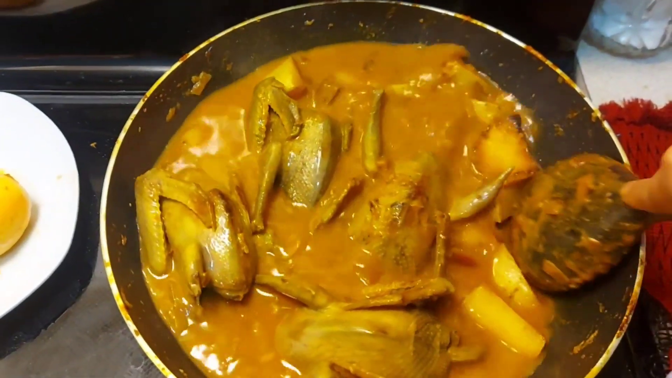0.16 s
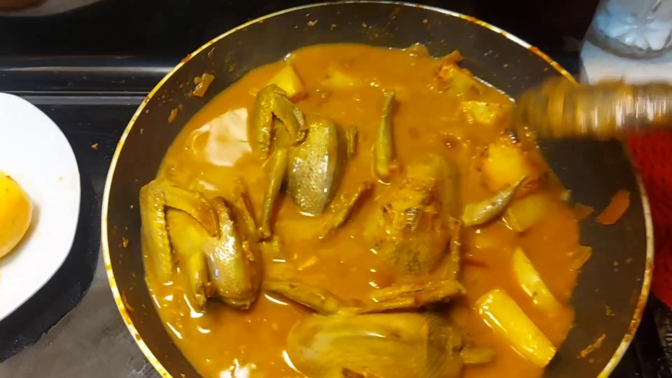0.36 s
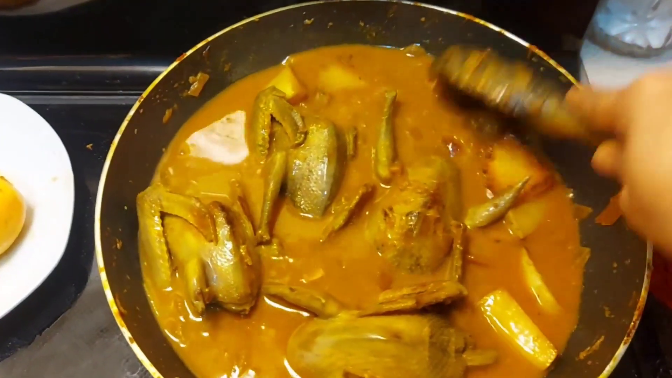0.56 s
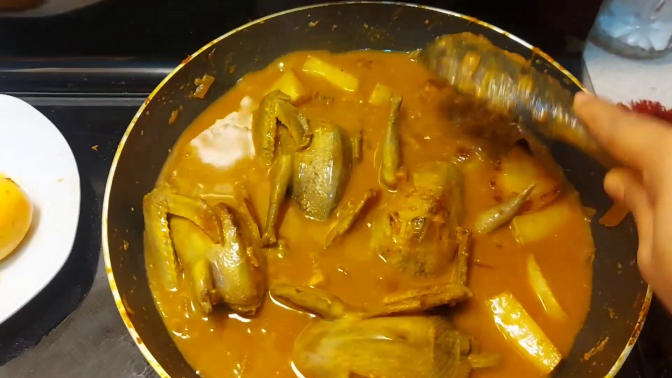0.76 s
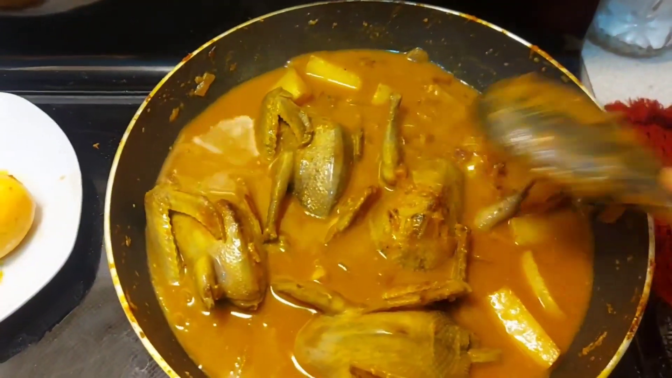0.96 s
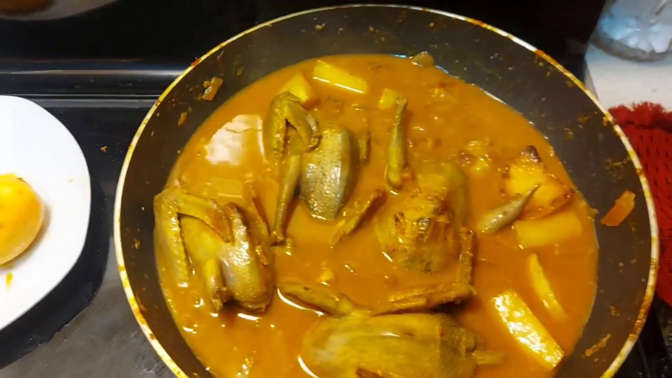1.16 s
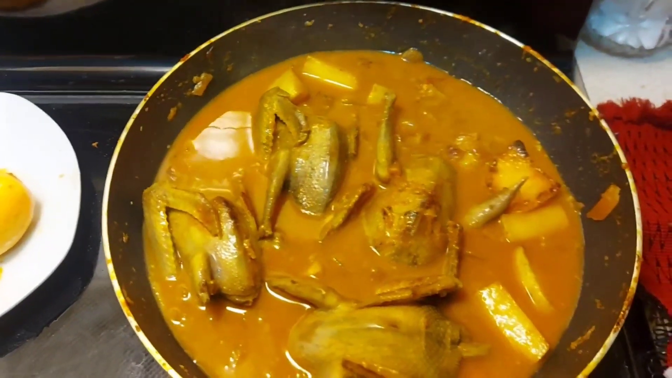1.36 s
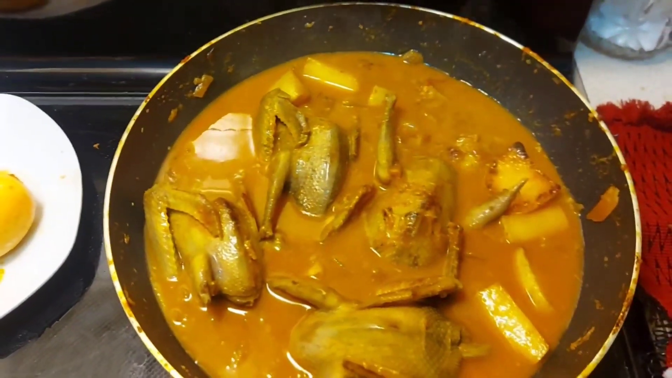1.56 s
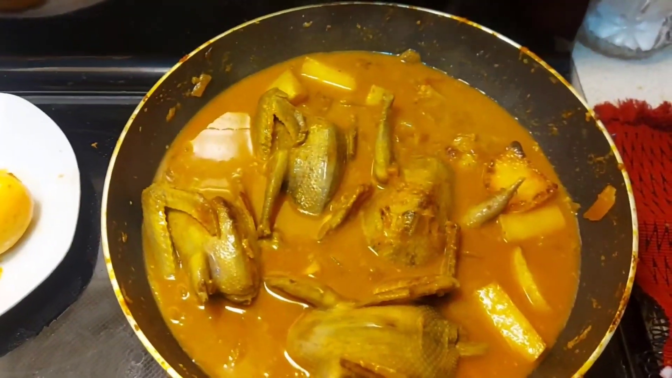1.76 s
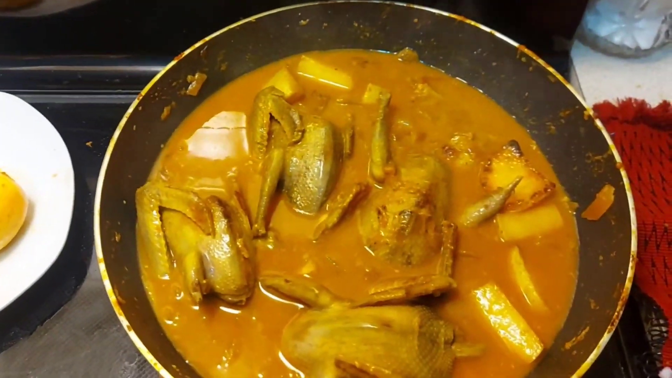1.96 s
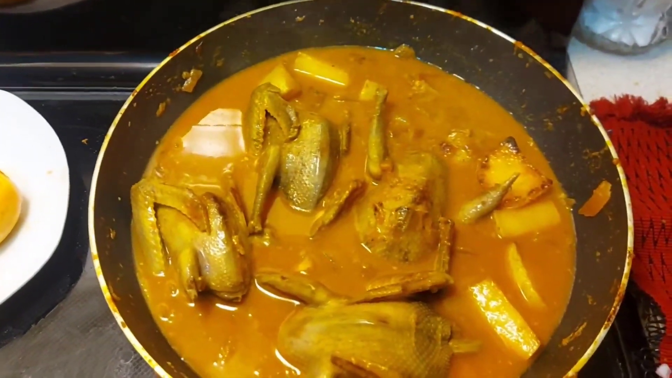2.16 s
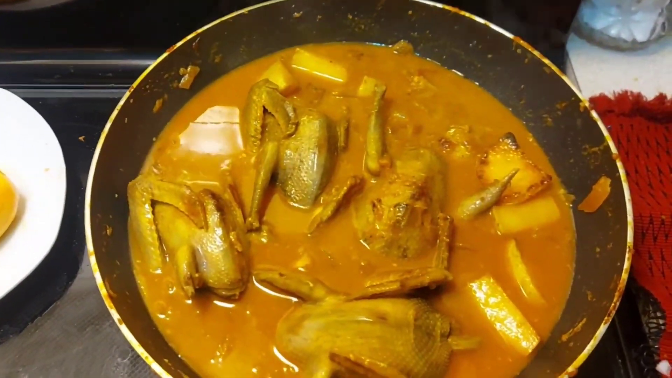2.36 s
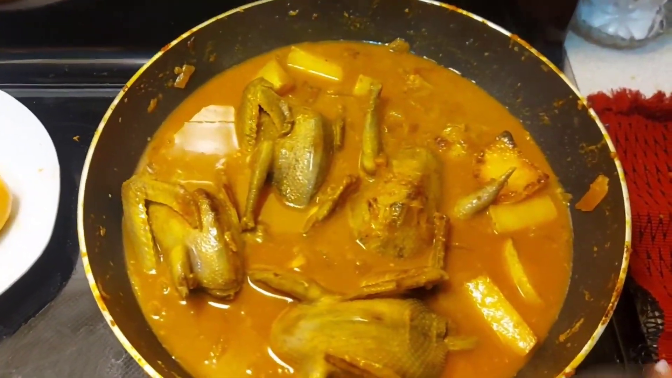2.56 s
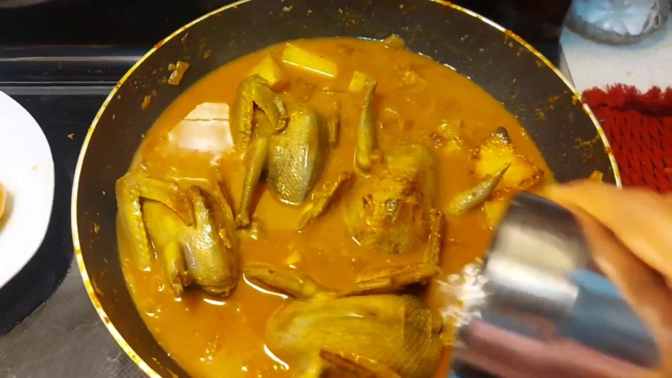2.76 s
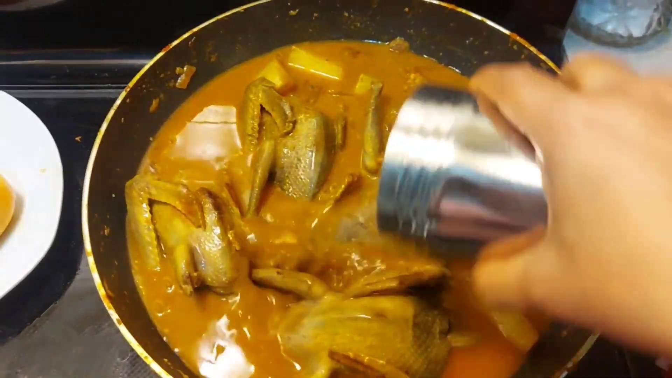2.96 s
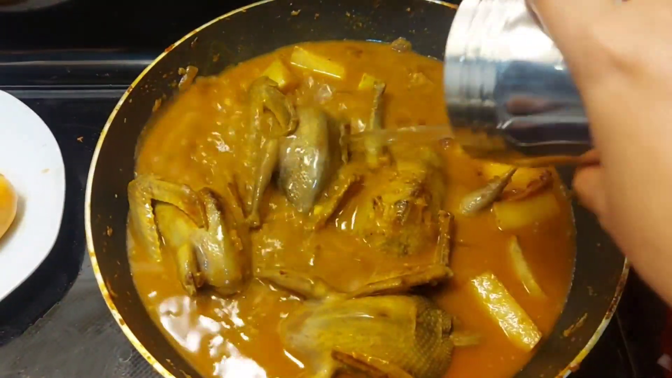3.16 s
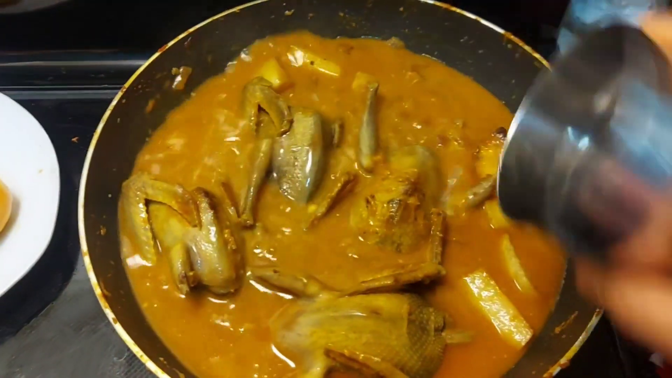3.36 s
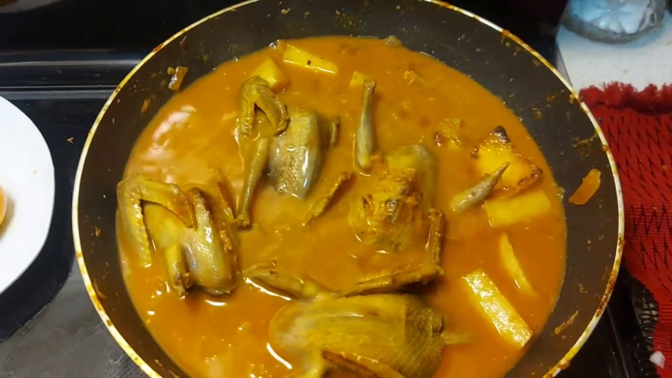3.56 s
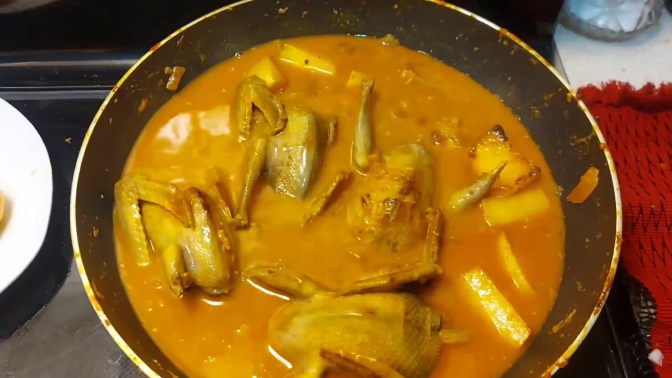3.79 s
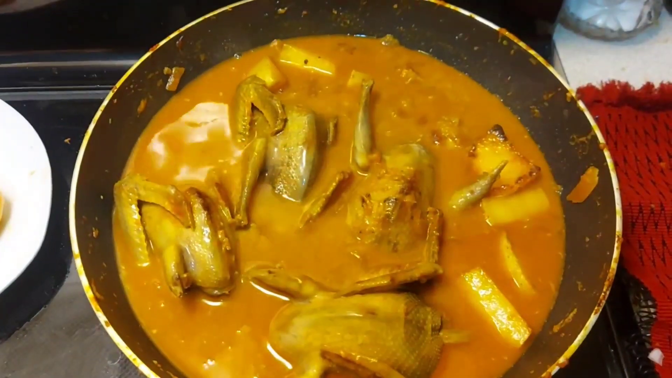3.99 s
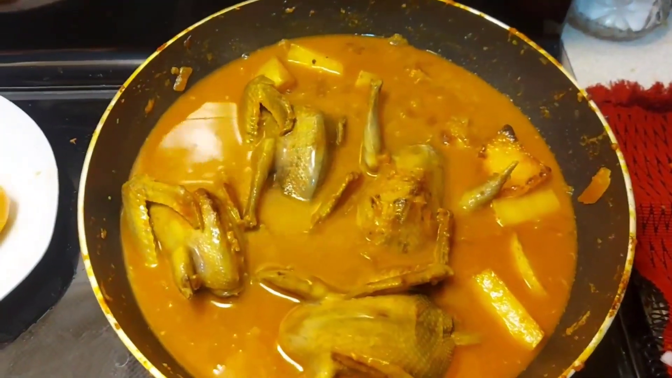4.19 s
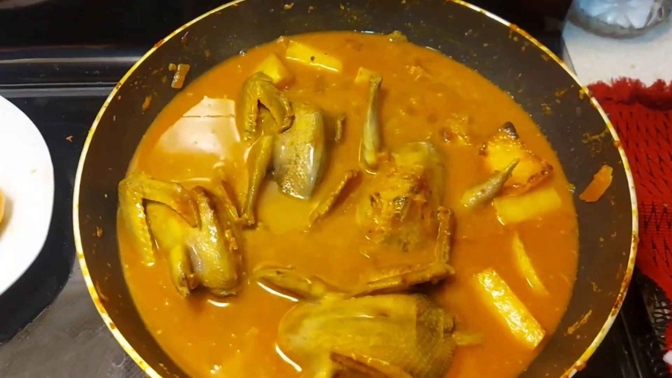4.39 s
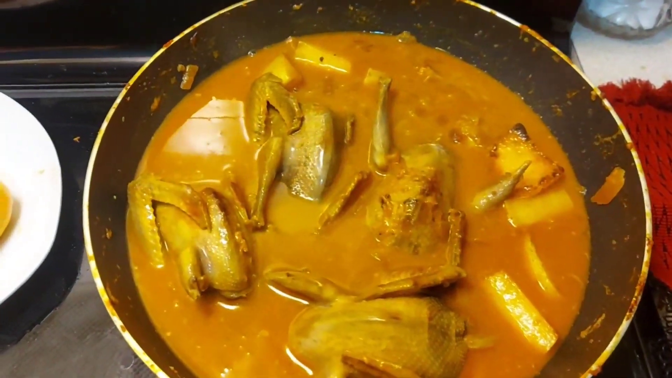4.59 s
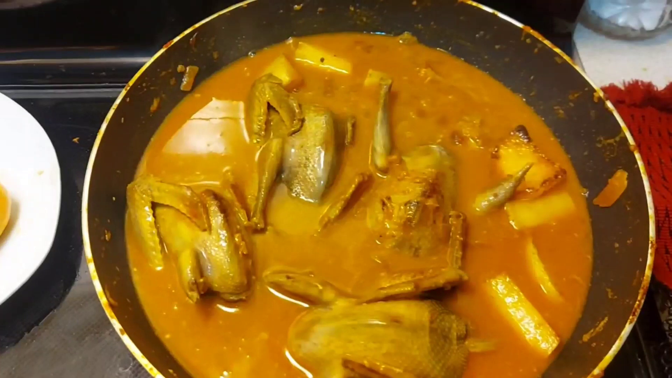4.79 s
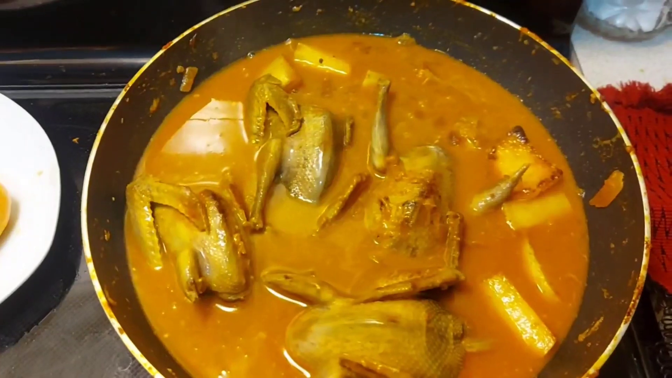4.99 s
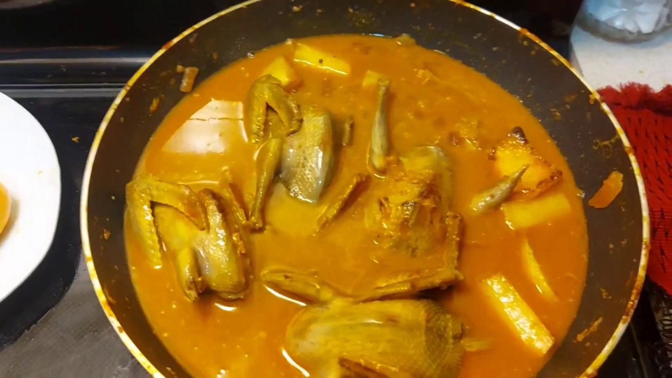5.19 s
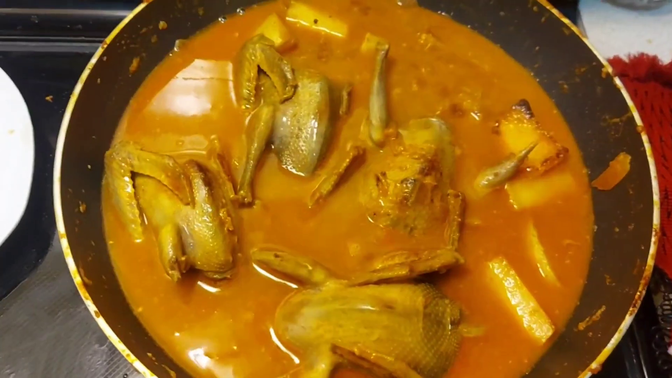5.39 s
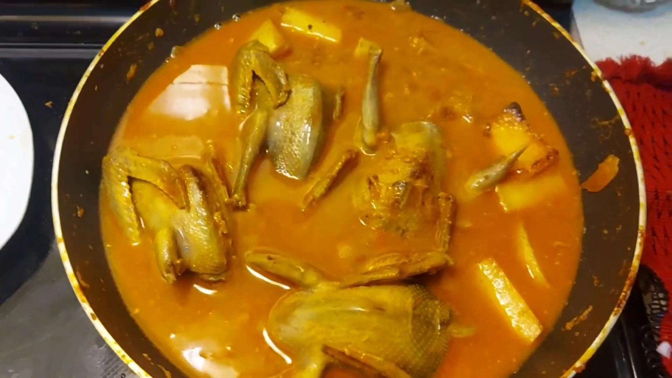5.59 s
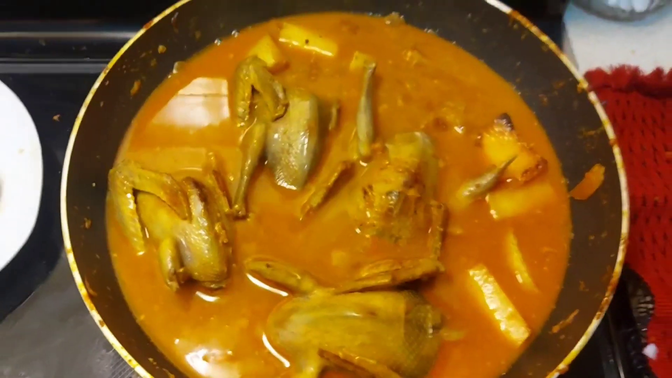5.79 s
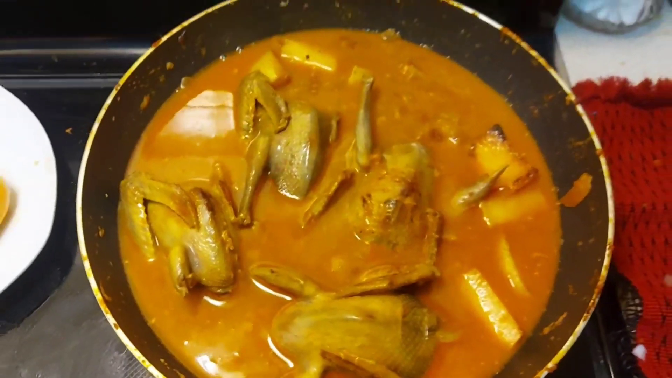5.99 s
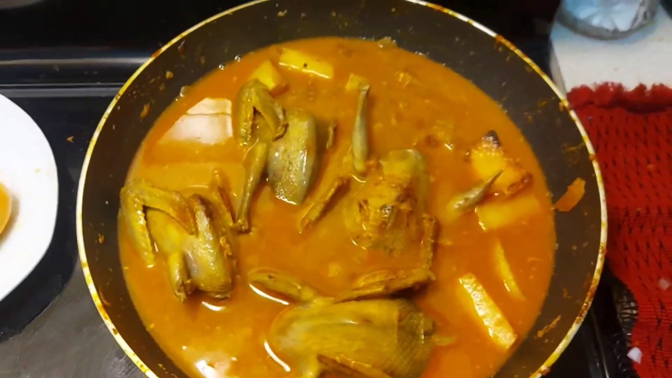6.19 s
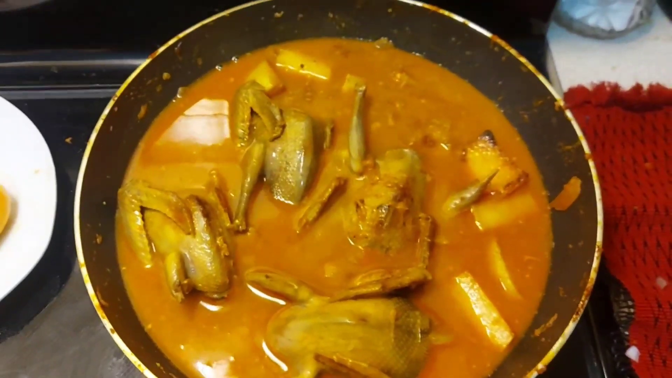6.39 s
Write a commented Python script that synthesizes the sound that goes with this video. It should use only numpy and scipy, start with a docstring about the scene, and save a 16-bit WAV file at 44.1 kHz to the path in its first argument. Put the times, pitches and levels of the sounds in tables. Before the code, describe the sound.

Low rumble, faint hum and a barely audible whine lie under everything. Muffled pan thuds with a scrape come first, then a spatula set down, a faint cup slide, a short bright bubbling splash, a loud cup knock with a softer clop, dull gravy plops, and a final ringing metallic bump. Close stereo microphone, short room tail, treble leaning left.

```python
"""A small kitchen, heard close to the stove on a stereo microphone, its short tail well below the direct sound.
A spatula leaves a pan of thin curry, tapping and scraping the rim, and is laid on the counter: thuds, dense
modes and rings. A steel cup slides off the counter, splashes water into the gravy (crowds of ringing bubbles,
wash, mist) and is set down with a sharp knock. The gravy plops in soft noise bursts, then a utensil rasps as
it is taken up and bumps the cookware. Rumble, hum and a thin whine of shaped noise and tone run throughout."""
import sys
import numpy as np
from scipy import signal
from scipy.fft import rfft, irfft, next_fast_len
from scipy.io import wavfile
from scipy.ndimage import uniform_filter1d

SR = 44100
rng = np.random.default_rng(int(sys.argv[2]) if len(sys.argv) > 2 else 0)


def dump_mix(stems):
    """Bounce the given channels to the path in sys.argv[1] as a 16-bit WAV at rate SR."""
    frames = np.atleast_2d(stems).T  # one column per channel
    limited = np.clip(frames, -1, 1)  # hard clip at full scale
    pcm = np.round(limited * 32767).astype(np.int16)
    wavfile.write(sys.argv[1], SR, pcm)


N = 284004
TIME = np.arange(N) / SR  # s, the whole scene
AGE = np.arange(SR * 3 // 4) / SR  # s, since the start of one event

# The kitchen's rumble. Each row: frequency in Hz, density in dB per Hz (relative).
ROOM_TONE = [(20, -7.5), (60, 7.5), (170, -1.5), (320, -6.5), (700, -16), (1000, -28), (3000, -33.5),
             (6300, -34), (8500, -50), (12000, -33), (16000, -43)]
# How loud the rumble stands. Each row: time in seconds, level in dB.
ROOM_LEVEL = [(4.0, -57), (4.95, -63), (5.25, -58)]
# Fine sizzle of the pan. Each row: time in seconds, level in dB before it is leaned to the left.
SIMMER = [(5.1, -78.5), (5.4, -76)]
# Likeness of the two ports in diffuse noise. Each row: frequency in Hz, left-right coherence from 0 to 1.
LIKENESS = [(60, 0.94), (250, 0.94), (600, 0.54), (1200, 0.034)]
# How far the left port leads. Each row: frequency in Hz, left minus right in dB.
LEFT_LEAD = [(350, 0), (1400, 4.5), (2800, 1.5), (5500, 8.5), (10000, 20), (15000, 10)]
# The room's tail. Each row: frequency in Hz, t60 in seconds.
KITCHEN_T60 = [(100, 0.41), (1500, 0.43), (4000, 0.26), (15000, 0.27)]

# Soft plops of the warming gravy. Each row: start in seconds, level in dB.
PLOPS = [(5.345, -59.5), (5.38, -59), (5.46, -62), (5.55, -61.5), (5.636, -61), (5.723, -63.5),
         (5.828, -61), (5.865, -56.5), (6.312, -63)]
# When the small bubbles pop between the plops: first and last second.
BUBBLING_S = (5.28, 6.0)
# Droplets flung from the splash and the cup's lip. Each row: landing in seconds, level in dB.
DROPLETS = [(3.283, -49), (3.401, -65), (3.66, -69.5), (3.78, -69.5)]
# Single large bubbles and drips. Each row: start in seconds, starting pitch in Hz, bubble level in dB.
DRIPS = [(2.921, 880, -47), (2.942, 1483, -51), (3.036, 5540, -38.5), (3.18, 1065, -35),
         (3.198, 3350, -25.5), (3.226, 2054, -32)]
# Bubbling of the unbroken stream of water. Each row: time in seconds, level in dB.
STREAM = [(2.915, -63), (3.02, -64), (3.16, -49), (3.25, -51.5), (3.37, -80)]
# Gushes of the poured water. Each row: start in seconds, level in dB, length in seconds
# before a further 2 ms, typical bubble pitch in Hz.
GUSHES = [(2.94, -54.5, 0.039, 2000), (3.0086, -43.5, 0.026, 3430), (3.046, -49, 0.025, 3250),
          (3.12, -43, .02, 3900), (3.18, -42.5, 0.012, 3160), (3.197, -42.5, .026, 3940),
          (3.222, -48.5, 0.019, 2400), (3.279, -46, 0.023, 4350)]

# The spatula scrapes along the rim. Each row: time in seconds, level in dB.
RIM_SCRAPE = [(.46, -61), (.478, -50), (.51, -60), (.545, -56), (.61, -66), (.67, -79)]
# Resonances of the pan wall that its slips excite, in Hz.
RIM_HZ = [1600, 2315, 2640, 3820]
# The cup slides off the counter. Each row: time in seconds, level in dB.
CUP_SLIDE = [(2.06, -67.5), (2.2, -63.5), (2.225, -57), (2.3, -52), (2.33, -58), (2.42, -70.5)]
# Resonances of cup and counter that its slips excite, in Hz.
CUP_SLIDE_HZ = [500, 960, 1460, 2440, 3320]
# The utensil drags as it is taken up. Each row: time in seconds, level in dB.
UTENSIL_RASP = [(5.997, -59), (6.004, -46), (6.025, -63.5), (6.09, -60.5)]
# Resonances of the utensil's drag, in Hz.
UTENSIL_RASP_HZ = [2560, 3250]
# Sharp ticks of spatula and utensil on the cookware. Each row: start in seconds, level in dB, t60 in seconds.
TICKS = [(0.171, -48.5, 0.028), (0.687, -47, 0.027), (6.425, -34, 0.098)]
# Colour of a tick. Each row: frequency in Hz, density in dB per Hz (relative).
TICK_COLOUR = [(900, -19), (1700, -4.5), (4250, 3.5), (5170, -4), (6790, -14.5), (8320, -49)]

# Blows, one table for each thing struck. Each row: start in seconds, strength in dB, hardness in dB
# (brightens the blow), damping in dB (hand or gravy takes the ring away).
PAN_BLOWS = [(.075, -51, -7.5, 37), (.112, -45, -0.5, 1.5), (.286, -52, -2.5, 4.5), (.469, -41, 1.5, 5),
             (.521, -41.5, -17, -7), (.537, -39, -4, -4), (.597, -38.5, -7, 34), (.688, -49.5, 5, 31),
             (.871, -45, -4, 41), (.96, -51, -13, 36)]
# Spatula laid on the counter. Each row: start in seconds, strength, hardness and damping in dB.
COUNTER_BLOWS = [(1.429, -43, -34, 1), (1.616, -38.5, -10, 7), (1.621, -36.5, -3.5, -3.5),
                 (1.638, -59.5, 20, 9)]
# Cup picked up. Each row: start in seconds, strength, hardness and damping in dB.
CUP_TOUCHES = [(2.039, -51.5, -9, 23), (2.05, -52.5, 4.5, 5.5), (2.16, -59.5, -3, 9), (2.207, -65, 14, -5),
               (2.294, -67, 15.5, 1)]
# Cup set down. Each row: start in seconds, strength, hardness and damping in dB.
CUP_KNOCKS = [(3.8673, -29, 3, -0.5), (3.874, -35.5, 2, 20.5), (4.0274, -37.5, -10, 15),
              (4.0384, -36, -7, 7.5)]
# Utensil taken up. Each row: start in seconds, strength, hardness and damping in dB.
UTENSIL_TOUCHES = [(5.999, -51.5, -8, 19), (6.095, -45.5, 3, -5.5), (6.17, -45, -3.5, 31),
                   (6.19, -44, 0, 29.5)]
# Utensil against the cookware. Each row: start in seconds, strength, hardness and damping in dB.
COOKWARE_BUMPS = [(6.3935, -34, 2.5, 27), (6.4015, -32.5, -14.5, 2.1), (6.4245, -35, -3, 6.7)]
# Ringing modes, one table for each thing. Each row: frequency in Hz, relative level in dB, t60 in seconds.
PAN_MODES = [(400, -2.5, 0.074), (730, 3.5, 0.057), (1137, 1, 0.18), (1527, -8.5, 0.17), (2283, -14, 0.17)]
# Modes of the counter. Each row: frequency in Hz, relative level in dB, t60 in seconds.
COUNTER_MODES = [(111.7, 9, 0.18), (292, 2, 0.14), (746, 0.5, 0.092)]
# Modes of the cup held in the hand. Each row: frequency in Hz, relative level in dB, t60 in seconds.
CUP_IN_HAND = [(1830, 2.4, 0.15), (3040, 9, 0.077), (4100, 5.4, 0.12), (4850, 7.9, 0.14), (6820, 9, 0.049)]
# Modes of the cup on the counter. Each row: frequency in Hz, relative level in dB, t60 in seconds.
CUP_ON_COUNTER = [(145, -8.5, .35), (298.5, 1.5, .27), (396.6, -1.5, .26), (599, -4, .28), (826, 0, 0.15),
                  (1073, -12, .3), (1431, -10.5, 0.44), (1805, -8, .33), (1946, -12, 0.28),
                  (2264, -13, 0.42), (2415, -8, 0.48), (2860, -10.5, .23), (3390, -12, 0.3),
                  (4180, -13.5, 0.37), (7100, -19, 0.37), (7400, -19.5, 0.15)]
# Modes of the cup's base. Each row: frequency in Hz, relative level in dB, t60 in seconds.
CUP_BASE = [(317, 0, 0.22), (851, 1.5, 0.079), (1133, 3, 0.13), (2740, 7, .04), (4050, -4, 0.044)]
# Modes of the utensil. Each row: frequency in Hz, relative level in dB, t60 in seconds.
UTENSIL_MODES = [(554, -3, 0.25), (2222, 11.5, 0.04), (3980, 2.5, 0.042), (11130, 2.5, 0.056)]
# Modes of the cookware. Each row: frequency in Hz, relative level in dB, t60 in seconds.
COOKWARE_MODES = [(286, 6, 0.23), (602, 6, 0.072), (1547, -7, 0.62), (2784, -3.5, 0.84)]
# Dense, short-lived modes of most blows. Each row: frequency in Hz, density in dB per Hz (relative).
BLOW_COLOUR = [(300, 5.5), (800, 4), (1300, 1), (2600, -4), (3600, -10), (5200, -10), (7400, -20),
               (8400, -34.5), (10800, -22.5), (15500, -39)]
# Dense modes of the steel cup set down. Each row: frequency in Hz, density in dB per Hz (relative).
CUP_COLOUR = [(850, 6.5), (1150, 2.5), (2600, 0.5), (4200, -7), (5450, -8), (6400, -23.5), (6850, -6),
              (7550, -13), (8300, -42), (10800, -19), (15500, -33)]

EDGE_HZ = 15900  # top of the recorder's band
MIST_HZ = 8250  # mist and droplets sound above this
WHINE_HZ, WHINE_DB = 3240, -87.5  # lower edge and level of the thin whine
PLOP_HZ, PLOP_OCTAVES_PER_DB = 723, -0.04  # pitch of the strongest plop; its sign lifts the weaker ones
DRIP_T60_AT_1K, DRIP_T60_SLOPE = 0.048, 0.28  # s at 1 kHz; octaves of t60 lost per octave of pitch
GRIT_T60 = 0.017  # s, one slip's speck of noise
THUD_OCTAVES_PER_DB = .045  # a lighter blow thuds higher
CLACK_PER_HARDNESS = .5  # dB of clack per dB of hardness
SOFTENING = 0.3  # dB of rise time per dB of hardness lost: softer contacts build more slowly
RING_WAVER_PER_S, ROUGH_HZ = 80, 3800  # loose contact makes the modes waver, fully so above this pitch
LEFT_RIGHT = np.array([[1], [-1]])


def amp(db):
    """Decibels to gain."""
    return 10 ** (np.asarray(db) / 20)


def evened(x):
    """Scales to rms 1."""
    return x / np.sqrt(np.mean(x ** 2) + 1e-20)


def struck(x):
    """Scales a blow to rms 1 over its first 25 ms."""
    return x / np.sqrt(np.mean(x[..., :SR // 40] ** 2) + 1e-20)


def read(points, hz):
    """A spectrum read on a log-frequency axis."""
    f, value = np.transpose(points)
    return np.interp(np.log(hz + 1), np.log(f + 1), value)


def level(curve):
    """A dB curve as a gain for every sample."""
    return amp(np.interp(TIME, *np.transpose(curve)))


def dying(t, t60):
    """Falls 60 dB in t60 seconds."""
    return np.exp(-np.log(1000) * t / np.maximum(t60, 1e-3))


def add(mix, s, sound):
    """Mixes a sound in at s seconds."""
    part = mix[:, max(round(s * SR), 0):][:, :sound.shape[-1]]
    part += sound[..., :part.shape[1]]


def band(x, lo, hi, order=3):
    """Causal band-pass."""
    sos = signal.butter(order, [lo, min(hi, SR / 2 - 1)], "band", fs=SR, output="sos")
    return signal.sosfilt(sos, x)


def noise(size, colour=None):
    """Stereo noise, alike in the bass and unrelated in the treble."""
    length = next_fast_len(size)
    hz = np.fft.rfftfreq(length, 1 / SR)
    a, b = rfft(rng.standard_normal((2, length)))
    same = np.clip(read(LIKENESS, hz), 0, 1)
    spectrum = np.array([a, same * a + np.sqrt(1 - same ** 2) * b])
    if colour is not None:
        spectrum = spectrum * amp(read(colour, hz))
    return evened(irfft(spectrum, length)[:, :size])


def background(hum_hz=64.8, hum_db=-68, apart_db=-14, whine_width_hz=45):
    """Room rumble, a wavering hum, a thin whine and the fine sizzle of the pan."""
    unrelated = np.array([noise(N, ROOM_TONE)[0] for port in range(2)])
    rumble = noise(N, ROOM_TONE) + amp(apart_db) * unrelated
    waver = evened(band(rng.standard_normal(N), 1.0, 5, order=1))
    hum = amp(hum_db) * evened((1 + 0.52 * waver) * np.sin(2 * np.pi * hum_hz * TIME))
    crackling = noise(N) * amp(3 * rng.standard_normal(N))
    sizzle = evened(band(crackling, 1400, 4800, order=2)) * amp([[2.5], [-5]])  # leans left
    whine = amp(WHINE_DB) * evened(band(noise(N), WHINE_HZ, WHINE_HZ + whine_width_hz, order=2))
    return level(ROOM_LEVEL) * rumble + hum + whine + level(SIMMER) * sizzle


def kitchen(x):
    """A short diffuse tail of the room, each band dying at its own speed."""
    hz, t, z = signal.stft(noise(len(AGE)), SR, nperseg=256)
    faded = z * dying(t, read(KITCHEN_T60, hz)[:, None])
    tail = signal.istft(faded, SR, nperseg=256)[1][:, :len(AGE)]
    tail = tail * np.clip((AGE - .003) / 0.0036, 0, 1)  # silent for 3 ms, then fades in
    return signal.fftconvolve(x, tail / np.linalg.norm(tail[0]), axes=1)[:, :N]


def bubble(hz, t60, glide=0.17):
    """A trapped bubble rings and climbs in pitch as it nears the surface."""
    t = AGE[:SR // 16]
    climb = 1 + glide * np.minimum(t / max(t60, 1e-3), 1)
    turns = np.cumsum(hz * climb) / SR
    lag = rng.uniform(-3.0, 2.6) * LEFT_RIGHT  # radians
    return np.sin(2 * np.pi * turns + lag) * dying(t, t60) * (1 - np.exp(-2 * hz * t))


def crowd(length, centre_hz, per_s, spread, cycles, size_db=6.5):
    """Bubbles of scattered pitch and size, trapped one after another; rms 1 while they form."""
    out = np.zeros((2, len(AGE)))
    draws = rng.random((900, 3))[:int(length * per_s) + 1]
    for k, (when, pitch, size) in enumerate(draws):
        hz = centre_hz * np.exp(spread * (2 * pitch - 1))
        gain = amp(-size_db * np.log(size + 0.17))
        add(out, (k + when) / per_s, gain * bubble(hz, cycles / hz))
    return out / np.sqrt(np.mean(out ** 2) * len(AGE) / (length * SR))


def plops(t60=0.1, splash_db=-9, splash_hz=2000, pops_db=-70, pop_cycles=16, rise=0.0027):
    """Thick bubbles burst with a dull puff and a thin splash; small ones pop between them."""
    out = np.zeros((2, N))
    strongest_db = max(db for s, db in PLOPS)
    burst = dying(AGE, t60) * (1 - dying(AGE, rise))
    for s, db in PLOPS:
        hz = PLOP_HZ * 2 ** (PLOP_OCTAVES_PER_DB * (db - strongest_db))
        puff = struck(band(noise(len(AGE)) * burst, hz / 1.51, hz * 1.67))
        splash = struck(band(noise(len(AGE)) * burst, splash_hz / np.sqrt(2), splash_hz * np.sqrt(2)))
        add(out, s, amp(db) * (puff + amp(splash_db + db - strongest_db) * splash))
    for when, pitch, size in rng.random(size=(70, 3)):
        hz = PLOP_HZ * 2 ** (2 * pitch - .5)
        pop = amp(pops_db + 20 * size - 10 * pitch) * bubble(hz, pop_cycles / hz)
        add(out, BUBBLING_S[0] + when * np.ptp(BUBBLING_S), pop)
    return out * amp(LEFT_RIGHT)  # 2 dB to the left


def droplets(t60=.007):
    """Flung droplets land with tiny bright clicks."""
    out = np.zeros((2, N))
    for s, db in DROPLETS:
        click = band(noise(len(AGE)) * dying(AGE, t60), MIST_HZ, EDGE_HZ, order=1)
        add(out, s, amp(db) * struck(click))
    return out


def drips(splat_db=-3):
    """A drop slaps the surface and leaves one ringing bubble; small bubbles die sooner."""
    out = np.zeros((2, N))
    for s, hz, db in DRIPS:
        tone = bubble(hz, DRIP_T60_AT_1K / (hz / 1000) ** DRIP_T60_SLOPE)
        size = tone.shape[1]
        splat = evened(band(noise(size), hz / 0.83, hz * 1.25)) * dying(AGE[:size], 0.055)
        splat *= 1 - dying(AGE[:size], 0.0033)  # the liquid yields, so the slap has a rounded edge
        add(out, s, amp(db) * (tone + amp(splat_db) * splat))
    return out


def pour(wash_db=-6, mist_db=-18, mist_t60=0.53, spit_db=5):
    """The stream bubbles on; each gush churns the gravy, traps a crowd of bubbles and throws up fine mist."""
    out = np.zeros((2, N))
    start_s, end_s = STREAM[0][0], STREAM[-1][0]
    add(out, start_s, crowd(end_s - start_s, 3200, per_s=900, spread=0.66, cycles=28))
    out *= level(STREAM)
    for s, db, length, centre in GUSHES:
        length = length + .002
        wash = evened(band(noise(len(AGE)), centre / 2, centre * 2)) * np.exp(-AGE / length)
        spits = amp(spit_db * evened(uniform_filter1d(rng.standard_normal(len(AGE)), size=60)))
        mist = evened(band(noise(len(AGE)) * spits, MIST_HZ, EDGE_HZ, order=1)) * dying(AGE, mist_t60)
        bubbles = crowd(length, centre, per_s=1700, spread=0.687, cycles=32)
        add(out, s, amp(db) * (bubbles + amp(wash_db) * wash + amp(mist_db) * mist))
    return out * amp(LEFT_RIGHT)  # 2 dB to the left


def ring(modes, spread_hz=1800):
    """Dying modes; the higher ones waver more and reach the two ports out of step."""
    out = np.zeros((2, len(AGE)))
    for k, (hz, db, t60) in enumerate(modes):
        lag = rng.choice([-1, 1]) * min(hz / spread_hz, np.pi / 4) * LEFT_RIGHT
        steps = rng.standard_normal(size=128) + 1j * rng.standard_normal(size=128)
        rough = min(hz / ROUGH_HZ, 1)
        wander = np.interp(AGE * RING_WAVER_PER_S, np.arange(len(steps)), steps)
        waver = (1 + rough * wander) / np.sqrt(1 + 2 * rough ** 2)
        mode = amp(db) * dying(AGE, t60) * waver * np.exp(2j * np.pi * hz * AGE)
        out += (-1) ** k * (mode * np.exp(1j * lag)).imag
    return struck(out)


def scrape(curve, resonances_hz, slips_per_s, grit_db, size_db=2.5, t60=.02):
    """A dragged thing sticks and slips; each slip gives a speck of grit and rings one resonance."""
    out = np.zeros((2, N))
    for hz in resonances_hz:
        sizes = amp(size_db * np.minimum(rng.exponential(size=N), np.pi))
        slips = (rng.random(N) < slips_per_s / SR) * sizes
        grit = struck(noise(len(AGE), BLOW_COLOUR) * dying(AGE, GRIT_T60))
        speck = ring([(hz, 0, t60)]) + amp(grit_db) * grit
        out += signal.oaconvolve(slips[None], speck[:, :SR // 20], axes=1)[:, :N]
    touching = (TIME > curve[0][0]) & (TIME < curve[-1][0])
    return touching * level(curve) * evened(out)


def drags():
    """Stick-slip of the spatula on the rim, the cup on the counter and the utensil as it is taken up."""
    return (scrape(RIM_SCRAPE, RIM_HZ, slips_per_s=45, grit_db=-3)
            + scrape(CUP_SLIDE, CUP_SLIDE_HZ, slips_per_s=130, grit_db=4)
            + scrape(UTENSIL_RASP, UTENSIL_RASP_HZ, slips_per_s=600, grit_db=-7.5, t60=0.011))


def ticks():
    """A dry tick of dying noise with no thud."""
    out = np.zeros((2, N))
    for s, db, t60 in TICKS:
        add(out, s, amp(db) * struck(noise(len(AGE), TICK_COLOUR) * dying(AGE, t60)))
    return out


def blows(rows, modes, thud_hz, clack_db, click_db, ring_db, crack_db, t60, thud_t60, rise,
          ripple_db=6.0, click_hz=2000, dulling=0, boom=0, colour=BLOW_COLOUR):
    """Each blow: a low thud of the support, a clack and a click of dense modes, and the thing's own ring."""
    out = np.zeros((2, N))
    # the contact cracks ahead of the ringing
    fade = dying(AGE, t60) * (1 + amp(crack_db) * dying(AGE, 0.016))
    # the dense modes cluster in peaks and valleys that belong to the thing, the same at every blow
    clusters = uniform_filter1d(rng.standard_normal(len(AGE) // 2 + 1), size=45)
    ripple = amp(ripple_db * evened(clusters))
    heaviest_db = max(row[1] for row in rows)
    sharpest_db = max(row[1] + row[2] for row in rows)
    for s, db, hardness, damping in rows:
        onset = 1 - dying(AGE, rise * amp(-SOFTENING * hardness))
        dense = irfft(rfft(noise(len(AGE), colour)) * ripple, len(AGE))
        hz = thud_hz * 2 ** (THUD_OCTAVES_PER_DB * (heaviest_db - db))
        thud = band(noise(len(AGE)) * dying(AGE, thud_t60), hz / 2.0, hz * 1.36, order=2)
        # the thing rocks on its support
        rocking = np.sin(2 * np.pi * hz * AGE) * dying(AGE, thud_t60) * onset
        thud = struck(thud) + boom * struck(rocking)
        clack = band(dense * fade, 420, 2000) * onset
        # with dulling, a gentler contact is duller
        top_hz = EDGE_HZ * amp(dulling * (db + hardness - sharpest_db))
        click = band(dense, click_hz, max(top_hz, 2 * click_hz)) * fade * onset
        blow = struck(thud)
        blow = blow + amp(click_db + hardness) * struck(click)
        blow = blow + amp(clack_db + CLACK_PER_HARDNESS * hardness) * struck(clack)
        blow = blow + amp(ring_db - damping) * ring(modes) * onset
        add(out, s, amp(db) * blow)
    return out


def spatula_on_pan():
    """The spatula's blows boom the pan on its support; above the bass the pan lies further left."""
    pan = blows(PAN_BLOWS, PAN_MODES, thud_hz=123.4, boom=0.8, clack_db=-21.0, click_db=-12.0,
                ring_db=-4.0, crack_db=20, t60=0.37, thud_t60=0.36, rise=0.034)
    return pan + band(pan, 710, 12000, order=1) * .2 * LEFT_RIGHT


def spatula_on_counter():
    """The spatula is laid down and the counter's low modes answer."""
    return blows(COUNTER_BLOWS, COUNTER_MODES, thud_hz=188, clack_db=-4.0, click_db=-4.5, ring_db=5.0,
                 crack_db=7.0, t60=0.16, thud_t60=0.17, rise=0.011, click_hz=4100)


def utensil_taken_up():
    """Light touches set off the utensil's short, high modes."""
    return blows(UTENSIL_TOUCHES, UTENSIL_MODES, thud_hz=278, clack_db=-11.5, click_db=-7.0, ring_db=-8.0,
                 crack_db=0, t60=0.18, thud_t60=0.26, rise=0.0061)


def cookware_bumped():
    """The utensil bumps the cookware, whose upper modes are long."""
    return blows(COOKWARE_BUMPS, COOKWARE_MODES, thud_hz=187, clack_db=-8.0, click_db=-6.0, ring_db=7.5,
                 crack_db=4.0, t60=0.16, thud_t60=0.1, rise=0.0034)


def cup_up():
    """Touches of the cup as it is picked up, its modes short in the hand."""
    return blows(CUP_TOUCHES, CUP_IN_HAND, thud_hz=123, clack_db=-10.0, click_db=-9.0, ring_db=2.5,
                 crack_db=4, t60=0.16, thud_t60=0.12, rise=0.0058)


def cup_down(flat_s=4.052, held_t60=0.27, base_db=-1, shock_db=-7, shock_s=.0003):
    """The cup lands on its edge with one hard shock, chatters and rings until it rocks flat:
    its base clops and the counter damps the wall."""
    cup = blows(CUP_KNOCKS, CUP_ON_COUNTER, thud_hz=230, clack_db=8.0, click_db=5.5, ring_db=5.5,
                crack_db=14.5, t60=0.21, thud_t60=0.13, rise=0.003, ripple_db=0.5, dulling=0.56,
                colour=CUP_COLOUR)
    u = AGE / shock_s
    add(cup, CUP_KNOCKS[0][0], amp(shock_db) * band((1 - u) * np.exp(-u), 100, 7000))
    for s, db, hardness, damping in CUP_KNOCKS:
        if s > flat_s - .1:  # only the last knocks reach the base
            add(cup, s, amp(db + base_db) * ring(CUP_BASE))
    return cup * dying(np.maximum(TIME - flat_s, 0), held_t60)


def ports(x):
    """The microphone's right port is shaded, so the treble leans left."""
    lead = read(LEFT_LEAD, np.fft.rfftfreq(2 * N, 1 / SR))
    gains = amp(np.array([lead, -lead]) / 2)
    gains = gains / np.sqrt(np.mean(gains ** 2, axis=0))
    return irfft(rfft(x, 2 * N) * gains)[:, :N]


def scene():
    """Spatula, cup, gravy and utensil, with the kitchen's tail and its background."""
    gravy = plops() + droplets() + drips() + pour()
    things = drags() + ticks() + spatula_on_pan() + spatula_on_counter()
    things = things + utensil_taken_up() + cookware_bumped() + cup_up() + cup_down()
    tail = kitchen(amp(-15.0) * things + amp(-13.0) * gravy)
    return ports(things + gravy + tail) + background()


def record(dry):
    """The microphone's low cut, then the recorder's band limit."""
    thinned = signal.sosfilt(signal.butter(2, 42, "high", fs=SR, output="sos"), dry)
    band_limit = signal.firwin(511, EDGE_HZ, window=("kaiser", 9), fs=SR)
    return signal.oaconvolve(thinned, band_limit[None], "same")


dry = scene()
out = record(dry)
dump_mix(out)
```